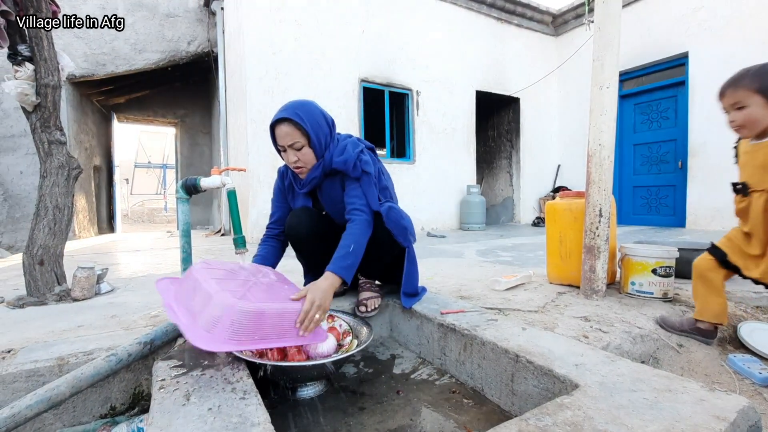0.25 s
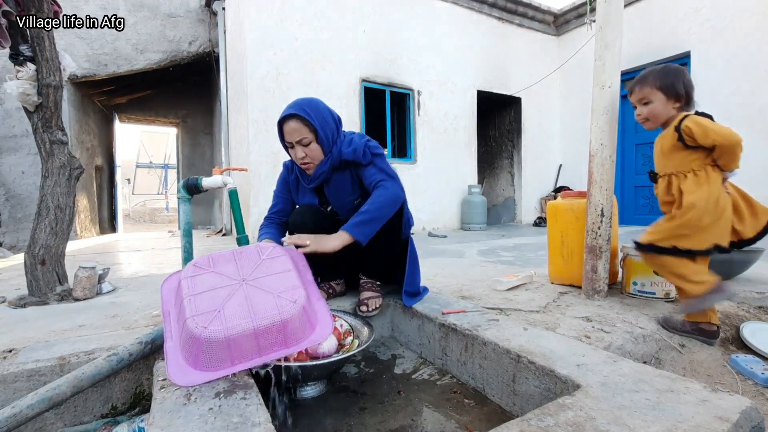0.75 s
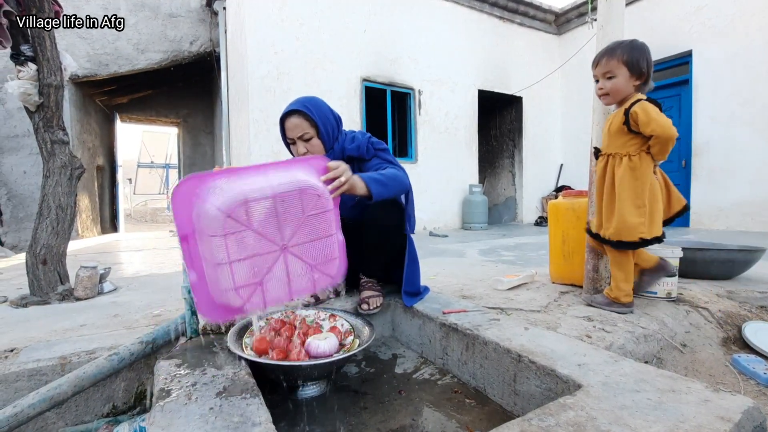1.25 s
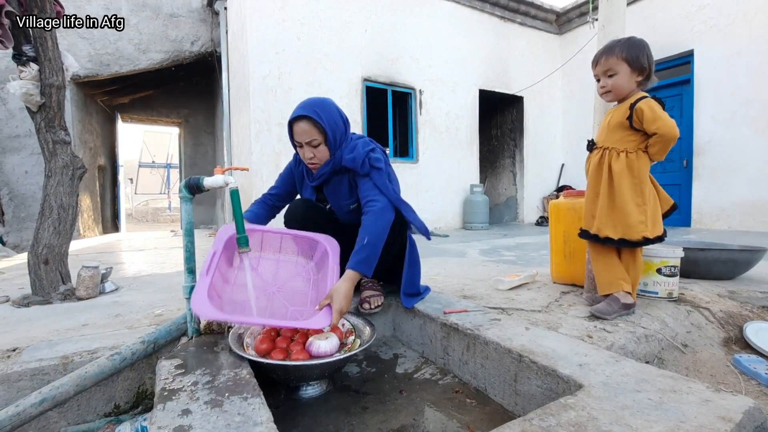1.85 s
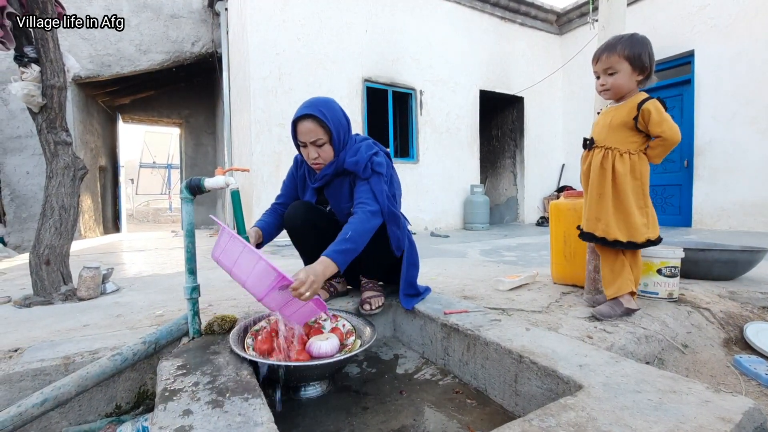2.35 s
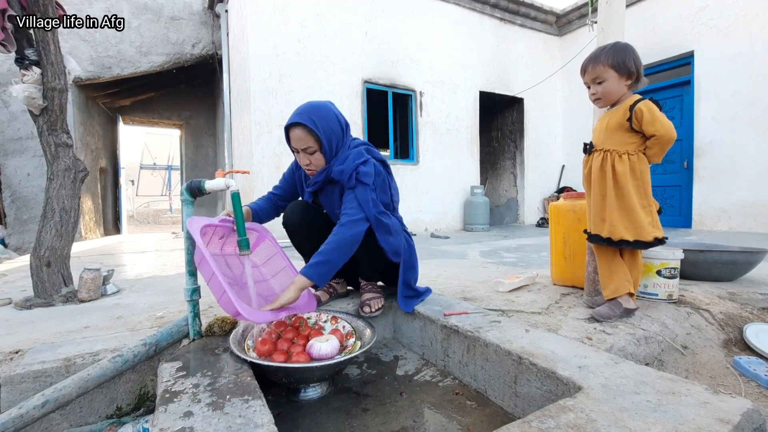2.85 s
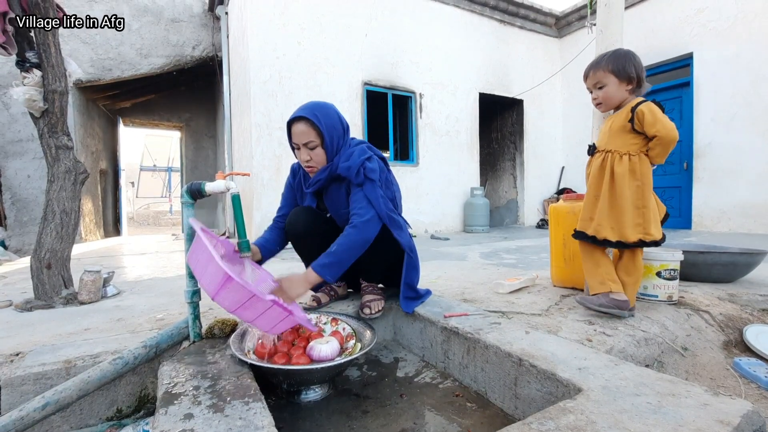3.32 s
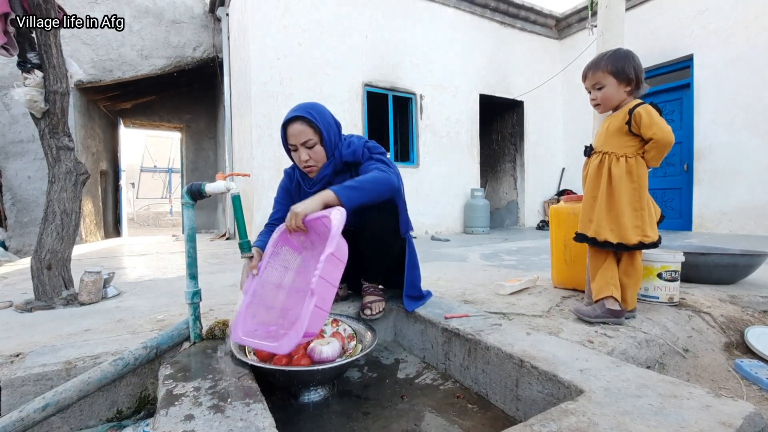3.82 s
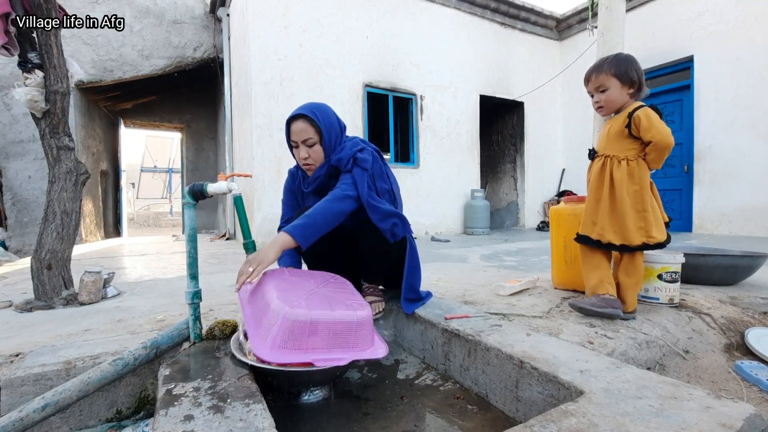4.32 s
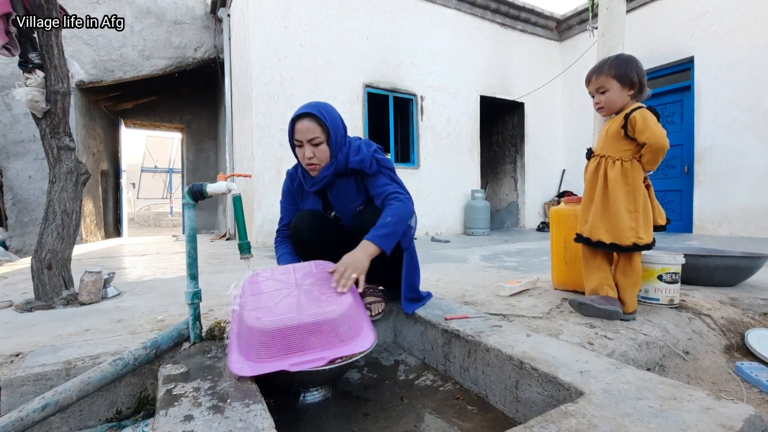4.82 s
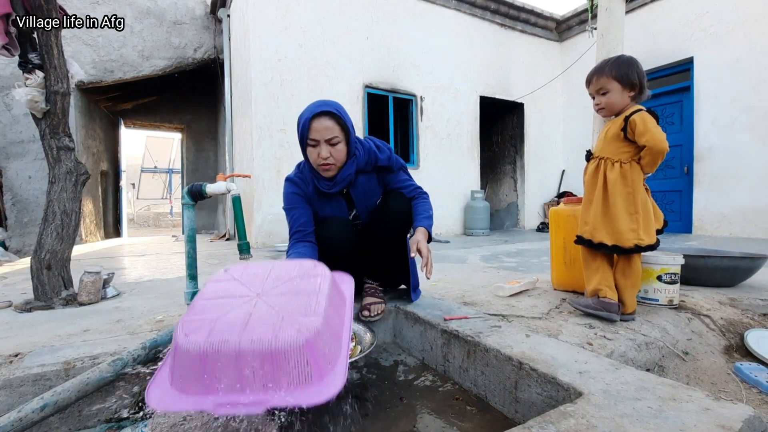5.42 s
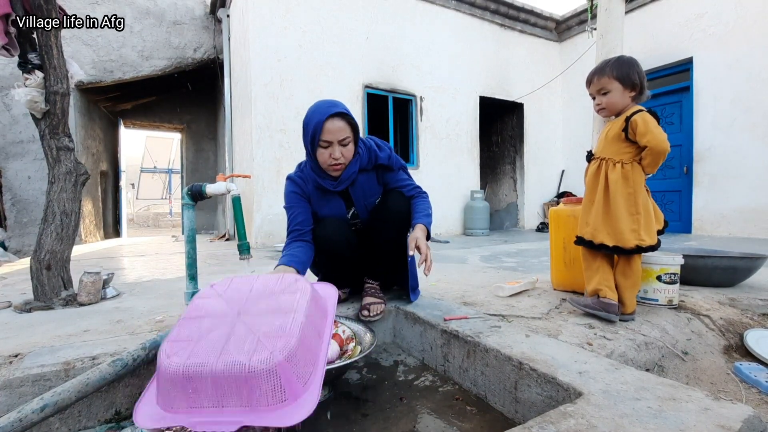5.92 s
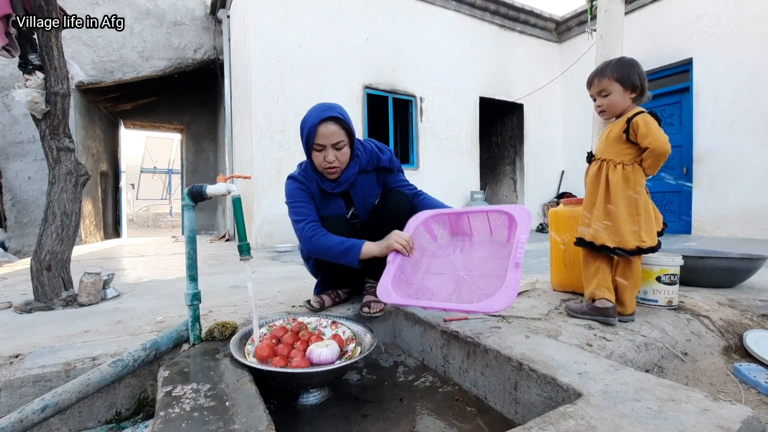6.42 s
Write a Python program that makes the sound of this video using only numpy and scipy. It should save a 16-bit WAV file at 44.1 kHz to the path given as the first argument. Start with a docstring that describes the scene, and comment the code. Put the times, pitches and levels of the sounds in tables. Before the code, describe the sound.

Close outdoor rinsing: bubbling, uneven water spray, hollow plastic thuds and clacks, and finally three hard knocks of a basket on a concrete rim.

```python
"""An outdoor tap runs into a steel bowl of vegetables while a plastic basket is rinsed under it.
From the start, droplet tones and hiss make the water, and low noise makes the jet drum on the basket.
Noise bursts and fading tones then make the spits, bumps and flexing walls; a flat wall hums at times.
Near the end the basket is knocked three times on the concrete rim to shake it dry.
Courtyard walls answer faintly with a fading noise echo, over steady, quiet air."""
import sys
import numpy as np
from scipy import signal
from scipy.fft import rfft, irfft, next_fast_len
from scipy.io import wavfile
from scipy.ndimage import uniform_filter1d, map_coordinates

SR = 44100
rng = np.random.default_rng(int(sys.argv[2]) if len(sys.argv) > 2 else 0)


def log_audio(samples):
    """Write samples as a 16-bit WAV file to the path given in sys.argv[1]."""
    # one column per channel
    frames = np.atleast_2d(samples).T
    # limit to full scale, then quantise
    limited = np.clip(frames, -1, 1)
    pcm = np.round(limited * 32767).astype(np.int16)
    wavfile.write(sys.argv[1], SR, pcm)


N = 294147  # length in samples

# The bright snap of hard or wet contact. Each row: frequency in Hz, relative level in dB.
CRACK_SPECTRUM = [(1500, -9), (2800, 6), (5600, -2.5), (8000, 2), (9500, -3.5), (12500, -5), (16000, -1)]


def amp(db):
    """Turn decibels into a plain multiplier."""
    return 10 ** (np.asarray(db) / 20)


def unit(x):
    """Scale a sound to an rms (average strength) of 1."""
    return x / np.sqrt(np.mean(x ** 2) + 1e-20)


def along(points, hz):
    """Read a curve of (Hz, value) points, with frequency on a log axis."""
    f, v = np.transpose(points)
    return np.interp(np.log(hz + 1), np.log(f), v)


def curves(rows):
    """Join timed rows with straight lines: one curve for each column after the time."""
    s, *cols = np.transpose(rows)
    return [np.interp(np.arange(N) / SR, s, c) for c in cols]


def wobble(rate):
    """Make a smooth random curve through `rate` random points a second."""
    points = rng.standard_normal(int(N * rate / SR) + 4)
    return map_coordinates(points, [np.arange(N) * rate / SR])


def filtered(x, response):
    """Multiply the spectrum of x by a function of frequency."""
    n = x.shape[-1]
    m = next_fast_len(n + 8192)  # spare room for the filter to die away
    return irfft(rfft(x, m) * response(np.fft.rfftfreq(m, 1 / SR)), m)[..., :n]


def coloured(x, spectrum):
    """Filter x by a table of (Hz, dB) points and scale it to rms 1."""
    return unit(filtered(x, lambda hz: amp(along(spectrum, hz))))


def add(track, s, sound):
    """Mix a sound into a track at time s in seconds."""
    part = track[round(s * SR):][:len(sound)]
    part += sound[:len(part)]


def gate(rows, edge_s):
    """Hold each (from, to, value) row for its span, with short ramps at both ends."""
    t = np.arange(N) / SR
    total = 0
    for start, end, value in rows:
        total = total + value * np.clip(np.minimum(t - start, end - t) / edge_s + .5, 0, 1)
    return total


def swells(rows, attack_s, t60, sag_db_per_s=0):
    """Gain of (from, to, dB) contacts of the jet: each rises, holds or sags, then dies away."""
    t = np.arange(N) / SR
    total = 0
    for start, end, db in rows:
        rise = np.clip((t - start) / attack_s, 0, 1)
        sag_db = sag_db_per_s * np.maximum(t - start, 0)
        fade_db = 60 * np.maximum(t - end, 0) / t60
        total = total + rise * amp(db - sag_db - fade_db)
    return total


def drops(rate, low_hz, high_hz, cycles, spread_db, rise, size):
    """A shower of tiny fading tones of uneven strength, each rising in pitch; rms 1."""
    draws = rng.random((int(rate * N / SR), 4))  # `rate` drops a second
    when, pitch, strength, life = draws.T[:, :, None]
    t = np.arange(size) / SR  # each drop is `size` samples long
    hz = low_hz * (high_hz / low_hz) ** pitch
    age = t * hz / (cycles * (.5 + life))  # time counted in the drop's own lifetimes
    phase = 2 * np.pi * hz * t * (1 + rise * np.minimum(age, 2))
    tone = np.sin(phase) * np.exp(-age)
    gain = amp(-spread_db * np.log(np.maximum(strength, .01))) * np.sqrt(hz)  # strong drops are rare
    places = (when * N).astype(int) + np.arange(size)
    return unit(np.bincount(places.ravel(), (gain * tone).ravel(), N + size)[:N])


def ring(modes, t, scatter_db, low_db=0):
    """Fading tones, struck at slightly new strengths and pitches; low_db adds to those under 700 Hz."""
    hz, db, t60 = np.transpose(modes)[:, :, None]
    level, detune = rng.standard_normal((2, len(modes), 1))
    sign = (-1) ** np.arange(len(modes))[:, None]
    gain = amp(db + scatter_db * level + low_db * (hz < 700) - 60 * t / t60)
    tones = np.sin(2 * np.pi * hz * (1 + 0.011 * detune) * t)
    return np.sum(sign * gain * tones, 0)


def burst(spectrum, t, t60, attack):
    """Coloured noise, evened out in power, that starts over `attack` seconds and dies away."""
    noise = coloured(rng.standard_normal(len(t)), spectrum)
    noise = noise / np.sqrt(np.abs(uniform_filter1d(noise ** 2, size=200)) + 0.062)
    return noise * amp(-60 * t / t60) * (1 - np.exp(-t / attack))


def scattered(x, size=2048):
    """Close, diffuse reflections off the basin; a new noise tail for each block keeps them free of pitch."""
    blocks = np.pad(x, (0, -N % size)).reshape(-1, size)
    t = np.arange(size) / SR
    tails = rng.standard_normal((2, len(blocks), size)) * amp(-60 * t / 0.041) * (t > .002)
    tails /= np.linalg.norm(tails, axis=2, keepdims=True)
    y = signal.fftconvolve(blocks[None], np.pad(tails, ((0, 0), (0, 0), (0, 1))), axes=2)
    own = y[..., :size].reshape(2, -1)
    spill = y[..., size:].reshape(2, -1)  # reflections that run on into the next block
    return own[:, :N] + np.pad(spill, ((0, 0), (size, 0)))[:, :N]


def placed(x, left_db, near_db):
    """A source left of centre with its close reflections."""
    lag = 7  # samples by which the right ear hears it later
    direct = np.array([x, np.pad(x, (lag, 0))[:N]])
    both = direct + amp(near_db) * scattered(x)
    return both * amp([[left_db / 2], [-left_db / 2]])


def yard():
    """The faint steady air of the courtyard: noise partly shared by both ears."""
    # Each row: frequency in Hz, relative level in dB.
    air_spectrum = [(15, -36), (25, -6), (69, -14), (162, 0), (218, -15), (300, -3), (543, 3.5),
                    (1270, -2.5), (4000, -7), (5200, -7), (8800, -120)]
    shared, separate = rng.standard_normal(N), rng.standard_normal((2, N))
    return amp(-63) * coloured(shared + .5 * separate, air_spectrum)


def water():
    """The stream breaks into surging gouts of tiny bubbles, a few plinks and fine crackling spray."""
    # The running water. Each row: time in seconds, splash and spray levels in dB before trims and surges.
    flow = [(0.0, -50, -51), (0.61, -63.5, -55), (0.91, -50, -55), (1.37, -51.5, -49), (1.63, -58, -52.5),
            (2.01, -53.5, -50.5), (2.19, -58, -55), (2.4, -55, -56.5), (2.69, -55, -51), (2.99, -52.5, -50),
            (3.94, -57.5, -55), (4.35, -53, -52), (4.98, -60.5, -52.5), (5.2, -57.5, -53),
            (5.35, -55.5, -50.5), (5.72, -51, -53.5), (6.28, -55.5, -51.5), (6.67, -52, -48)]
    # The rim catches the stream and the splashing drops away.
    # Each row: start in seconds, end in seconds, depth in dB.
    catches = [(0.52, 0.68, 1), (0.99, 1.085, 6), (1.65, 1.84, 2), (2.2, 2.48, 3), (4.19, 4.215, 8),
               (4.68, 4.78, 6), (5.06, 5.15, 12.5)]
    # Water sheets off the tilted basket and the spray flares.
    # Each row: start in seconds, end in seconds, spray gain in dB.
    gushes = [(0.06, 0.11, 1), (1.17, 1.26, 1.5), (1.44, 1.62, 5), (1.93, 2.13, 3.5), (2.51, 2.6, 4.5),
              (4.1, 4.19, 6), (4.22, 4.33, 5.5), (5.16, 5.36, 3.5)]
    # Tone of the splash and of the spray. Each row: frequency in Hz, relative level in dB.
    splash_spectrum = [(150, -70), (250, -10), (318, -1), (372, -9.5), (594, -4), (713, -8), (1110, -0.5),
                       (1670, 3), (1880, 1.5), (3800, 2), (4940, -28), (8360, -120)]
    spray_spectrum = [(1470, -12.5), (2500, -9), (2990, -9), (3230, -8.5), (3490, -7), (5350, -4),
                      (7130, -4), (8020, -4), (9440, -12.5), (11500, -6.5), (14900, -9.5), (15600, -4.5),
                      (16000, -46)]

    splash_db, spray_db = curves(flow)
    caught_db = gate(catches, edge_s=0.0056)  # time the rim takes to cross the stream
    gush_db = gate(gushes, edge_s=0.023)  # time a gush takes to swell or stop
    gouts = wobble(70)

    bubbles = drops(rate=1600, low_hz=380, high_hz=3800, cycles=2, spread_db=3.6, rise=.03, size=330)
    crackle = drops(rate=3600, low_hz=2500, high_hz=15700, cycles=1.2, spread_db=4.9, rise=.03, size=70)
    plinks = drops(rate=90, low_hz=1800, high_hz=8000, cycles=9, spread_db=3.5, rise=.04, size=800)

    splash_db = splash_db + 1.5 - caught_db + 0.45 * gush_db
    splash_db = splash_db + 2.02 * gouts + 1.74 * wobble(25)
    splash = coloured(bubbles + 0.44 * rng.standard_normal(N), splash_spectrum) * amp(splash_db)

    spray_db = spray_db - 0.5 - caught_db + gush_db
    spray_db = spray_db + 1.76 * gouts + 0.68 * wobble(170)
    hiss = 0.4 * rng.standard_normal(N)  # smooth hiss under the single droplets
    fizz = coloured(crackle + hiss, spray_spectrum) + amp(-8.5) * plinks
    spray = fizz * amp(spray_db)
    return placed(splash + pours(), left_db=3.0, near_db=-2.5) + placed(spray, left_db=1.5, near_db=1.5)


def drumming():
    """The jet shakes the basket's thin plastic: low noise swells as each wall passes under it."""
    # Each row: start in seconds, end in seconds, level in dB before the final trim.
    contacts = [(0.0, 0.1, -50.5), (0.53, 0.66, -41), (0.69, 0.73, -32.5), (0.78, 0.94, -45.5),
                (1.0, 1.03, -42), (1.1, 1.25, -58), (1.32, 1.58, -50), (1.89, 2.06, -57.5),
                (2.54, 2.92, -39), (3.03, 3.15, -40.5), (3.22, 3.3, -61), (3.33, 3.57, -44),
                (3.68, 4.05, -51), (4.31, 4.38, -51), (4.845, 4.97, -38.5), (5.08, 5.11, -55),
                (5.28, 5.35, -59), (6.27, 6.33, -60.5), (6.46, 6.67, -56.5)]
    # Each row: frequency in Hz, relative level in dB.
    boom_spectrum = [(15, -42), (28, -35), (50, 9.5), (70, 8), (100, 5), (155, -8), (230, -21.5),
                     (320, -17.5), (500, -39), (1000, -46)]
    shake = coloured(rng.standard_normal(N), boom_spectrum)
    shake = shake / np.sqrt(np.abs(uniform_filter1d(shake ** 2, size=1400)) + 0.055)  # the jet pushes evenly
    push = swells(contacts, attack_s=0.0092, t60=0.2, sag_db_per_s=8)
    tremble = amp(-73.5)  # stray drops keep the plastic trembling in between
    return placed(amp(-1.0) * shake * (push + tremble), left_db=6.5, near_db=-2)


def spits():
    """Single spits of water slap on the basket: very short noise bursts around one pitch."""
    # Each row: start in seconds, strength in dB before a trim, centre pitch in Hz.
    slaps = [(0.2745, -28, 4470), (0.959, -24.5, 8100), (1.213, -28, 7150), (1.3753, -28, 5500),
             (1.931, -25.5, 6300), (2.0954, -28.5, 6660), (3.9095, -40, 8300), (3.9435, -33, 6250),
             (4.5042, -35, 4900), (5.1554, -30.5, 5470), (6.3, -28.5, 2340), (6.6145, -40, 4410)]
    track, t = np.zeros(N), np.arange(SR // 3) / SR
    for s, db, hz in slaps:
        spectrum = [(hz / 5, -25), (hz, 0), (hz * 3, -14)]
        add(track, s, amp(db - 3) * burst(spectrum, t, t60=0.013, attack=0.00011))
    return track


def flexing():
    """The basket's walls flex with low, quickly fading bending tones, mostly on the left."""
    # Each row: start in seconds, strength in dB before the left-right balance.
    thumps = [(0.585, -17.5), (0.694, -15), (4.021, -25.5), (4.846, -16.5), (4.967, -15.5)]
    # The slow bending modes. Each row: frequency in Hz, level in dB, time to fall 60 dB in seconds.
    bending_modes = [(57.4, -23, 0.059), (91, -7.5, 0.039), (150, -8.5, 0.053), (213, -20.5, 0.013)]
    low, t = np.zeros(N), np.arange(SR // 3) / SR
    for s, db in thumps:
        soft_start = 1 - np.exp(-t / 0.0022)
        add(low, s, amp(db) * ring(bending_modes, t, scatter_db=1) * soft_start)
    return low * amp([[8], [-8]])


def bumps():
    """Hands and bowl bump the wet basket: each bump mixes a clack, a pitched spot, a body and a crack."""
    # Each row: start in seconds, overall strength in dB, pitch in Hz, body level in dB before a trim,
    # crack level in dB, basic time to fall 60 dB in seconds (body and crack scale it).
    hits = [(0.691, -12, 1247, -46, -9.5, 0.02), (0.743, -25, 1250, -18, -29, 0.027),
            (0.786, -36, 1200, -7, -28, 0.037), (1.002, -32, 428, -12, -21, 0.047),
            (1.053, -39, 404, -4, -27, 0.039), (1.556, -28.5, 840, -18, -8, 0.068),
            (3.636, -29, 805, -30, -30, 0.035), (3.838, -29.5, 276, -6, -23, 0.05),
            (4.023, -35.5, 330, -5.5, -4, 0.061), (4.219, -36.5, 455, -17, -9, 0.47),
            (4.247, -19, 1610, -24.5, -7.5, 0.032), (4.314, -23, 1577, -14, -8, 0.087),
            (4.381, -31.5, 4730, -10.5, 7.5, 0.039), (4.542, -25.5, 1440, -19, -11, 0.03),
            (4.736, -37, 873, -24, -13, 0.074), (4.792, -24, 1610, -13, -35, 0.12),
            (5.012, -28, 3850, -38, -3, 0.062), (5.252, -27, 1233, -45, -15, 0.052)]
    # Tone of the clack and of the body. Each row: frequency in Hz, relative level in dB.
    clack_spectrum = [(350, -34), (600, -7), (1040, -4.5), (1310, -6.5), (1670, -2.5), (1830, 0),
                      (2250, -1), (2570, -2), (6000, -12.5), (7800, -84), (13200, -120)]
    body_spectrum = [(100, -27), (220, -5), (450, 4.5), (650, -8.5), (900, -3), (2000, -70)]
    track, t = np.zeros(N), np.arange(SR // 3) / SR
    for s, db, hz, body_db, crack_db, t60 in hits:
        clack = amp(-7) * burst(clack_spectrum, t, t60, attack=0.00038)
        spot_modes = [(.8 * hz, -6, t60), (hz, 0, t60), (1.1 * hz, -3, t60)]  # each spot has its own pitch
        spot = amp(-8.0) * ring(spot_modes, t, scatter_db=0.5)
        body = amp(body_db - 2.5) * burst(body_spectrum, t, 2.55 * t60, attack=0.00059)
        crack = amp(crack_db) * burst(CRACK_SPECTRUM, t, 0.63 * t60, attack=0.00041)
        add(track, s, amp(db) * (clack + spot + body + crack))
    return track


def pours():
    """The stream lands inside the basket or sloshes in the bowl: a hollow gurgles lower than open water."""
    # Each row: start in seconds, end in seconds, level in dB.
    landings = [(0.98, 1.14, -51.5), (1.56, 1.61, -47.5), (2.55, 2.66, -48), (3.41, 3.48, -50)]
    # Each row: frequency in Hz, relative level in dB.
    hollow_spectrum = [(150, -29), (300, -0.5), (600, -8), (1050, 1.5), (1600, -1.5), (4000, -45)]
    gurgle = drops(rate=500, low_hz=260, high_hz=1600, cycles=1.6, spread_db=2.5, rise=.03, size=550)
    return swells(landings, attack_s=0.014, t60=0.12) * coloured(gurgle, hollow_spectrum)


def humming():
    """The jet squarely on a flat wall builds its lowest modes into a hum; the higher ones are weaker."""
    # Each row: start in seconds, end in seconds, level in dB of the lowest mode in the left ear.
    hum_times = [(2.531, 2.63, -26), (6.538, 6.67, -47.5)]
    # The flat wall's two lowest modes, in Hz.
    panel_hz = [111, 172]
    # Weak upper modes. Each row: frequency in Hz, level in dB against the second mode.
    overtones = [(243, -12.5), (330, -20), (440, -18)]
    attack_s, t60 = 0.045, 0.39
    # the higher modes build 0.025 s later and hold on 0.2 s longer
    upper_times = [(start + 0.025, end + 0.2, db - 16) for start, end, db in hum_times]
    lower = swells(hum_times, attack_s, t60)
    upper = swells(upper_times, attack_s, t60)
    modes = [(panel_hz[0], lower), (panel_hz[1], upper)]
    modes += [(hz, upper * amp(db)) for hz, db in overtones]
    bent = np.arange(N) / SR + 0.00018 * wobble(20)  # the wall bends in the hand, so its pitch drifts
    hum = sum(gain * np.sin(2 * np.pi * hz * bent) for hz, gain in modes)
    return hum * amp([[0], [1.5]])


def knocks():
    """The rim hits concrete: a crack, a short smack, the basket's ring and the slow sway of its walls."""
    # Each row: start in seconds, then strength, body level and crack level in dB, all before trims.
    hits = [(5.4683, -7.5, -15, -13), (5.789, -8.5, -19.5, -10.5), (6.036, -13.5, -28, -6.5)]
    # The basket's ring. Each row: frequency in Hz, level in dB before trims, time to fall 60 dB in seconds.
    basket_modes = [(147.7, -18.5, 0.41), (197, -15.5, 0.34), (252, -23, 0.11), (317.5, -12, 0.16),
                    (373, -8, 0.11), (510, 0.5, 0.036), (635, -8, 0.098), (795, -11, 0.062),
                    (930, -2, 0.047), (1049, 1, 0.035), (1230, 3, 0.014), (1593, -1.5, 0.032),
                    (1820, -7, 0.047), (2090, -33, 0.056), (2810, -6, 0.018)]
    # Tone of the smack and of the sway. Each row: frequency in Hz, relative level in dB.
    smack_spectrum = [(120, -35), (260, -12), (400, 2), (540, 3.5), (740, -7.5), (1000, 5), (1550, -1),
                      (2050, -16), (3200, -31), (6000, -44)]
    sway_spectrum = [(35, -7), (65, -3.5), (150, -5.5), (330, -10), (520, -15.5), (1200, -31.5)]
    sway_lag_s = 0.013  # the slow bending wave crosses the basket before its walls sway
    track, t = np.zeros(N), np.arange(SR // 3) / SR
    for s, db, body_db, crack_db in hits:
        plastic = amp(-5.0) * ring(basket_modes, t, scatter_db=0.5, low_db=body_db + 13.5)
        smack = amp(-4.5) * burst(smack_spectrum, t, t60=0.065, attack=0.00024)
        sway = amp(-17.0) * burst(sway_spectrum, t, t60=0.23, attack=0.0046)
        crack = amp(crack_db + 12.0) * burst(CRACK_SPECTRUM, t, t60=0.015, attack=.0001)
        flung = amp(-17.5) * burst(CRACK_SPECTRUM, t, t60=0.13, attack=0.0063)  # water thrown off the mesh
        add(track, s, amp(db - 2.5) * (plastic + smack + crack + flung))
        add(track, s + sway_lag_s, amp(db - 2.5) * sway)
    return placed(track, left_db=3.5, near_db=-9.5)


def courtyard(x):
    """The walls' answer 10 ms later: a noise tail in which each frequency dies at its own speed."""
    # Each row: frequency in Hz, time to fall 60 dB in seconds.
    wall_fade = [(150, 0.2), (1000, 0.19), (10000, 0.15)]
    hz, t, z = signal.stft(rng.standard_normal((2, SR // 2)), SR, nperseg=256)
    fade = amp(-60 * t / along(wall_fade, hz)[:, None])
    tail = signal.istft(z * fade, SR, nperseg=256)[1]
    tail = tail / np.linalg.norm(tail[0])
    delayed = np.pad(x, ((0, 0), (SR // 100, 0)))
    return signal.fftconvolve(delayed, tail, axes=1)[:, :N]


def scene():
    """Mix all sources, with a weaker echo for the hard knocks than for the rest."""
    handling = placed(spits() + bumps(), left_db=3.5, near_db=-4) + flexing()
    wet = water() + drumming() + handling + humming()
    hard = knocks()
    echo = courtyard(amp(-13.0) * wet + amp(-22) * hard)
    return wet + hard + echo + yard()


def record(dry):
    """Cut the treble steeply above the band limit."""
    top_hz = 15800
    return filtered(dry, lambda hz: 1 / np.sqrt(1 + np.minimum(hz / top_hz, 1.3) ** 260))


dry = scene()
out = record(dry)
log_audio(out)
```